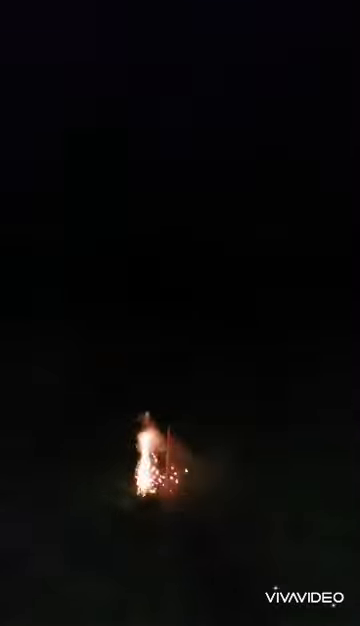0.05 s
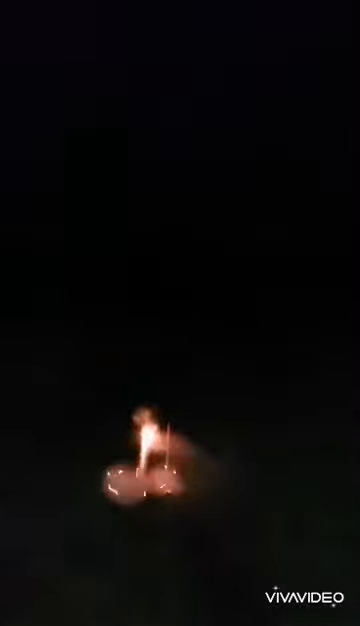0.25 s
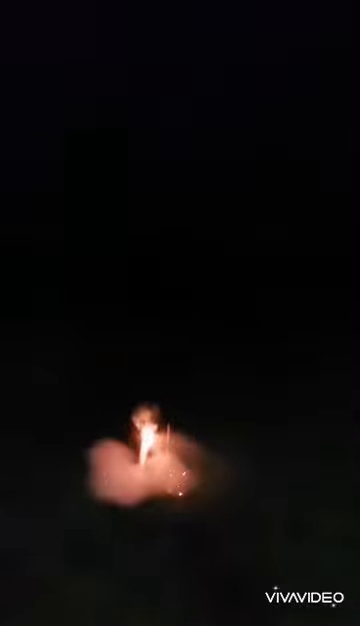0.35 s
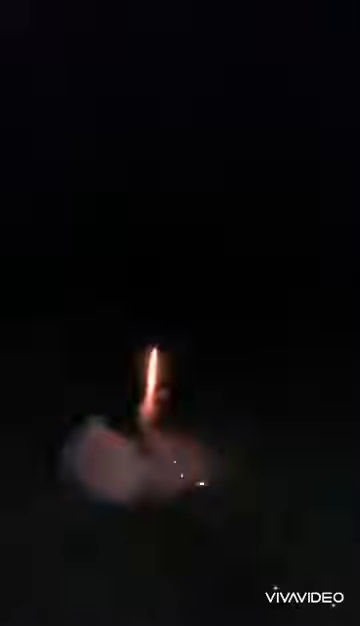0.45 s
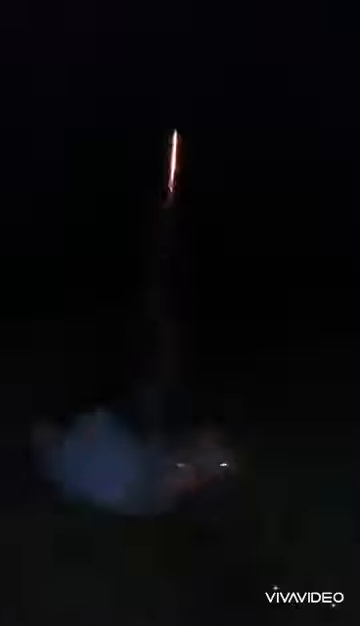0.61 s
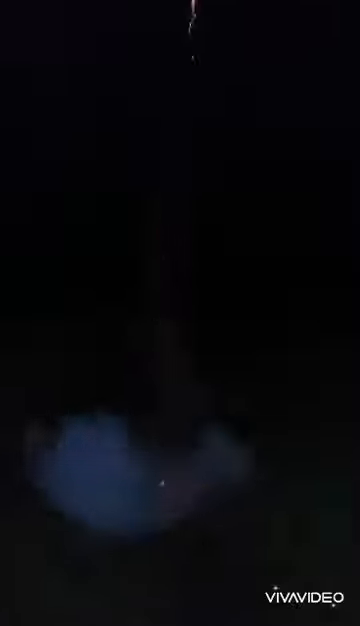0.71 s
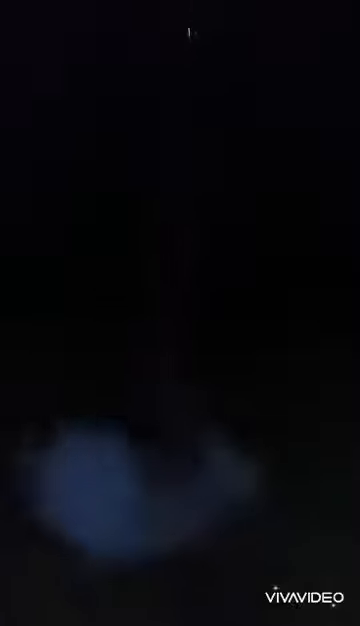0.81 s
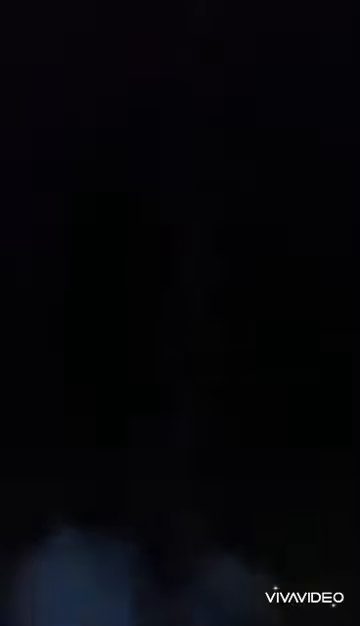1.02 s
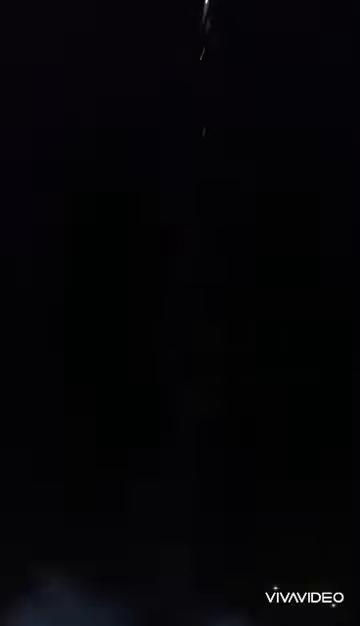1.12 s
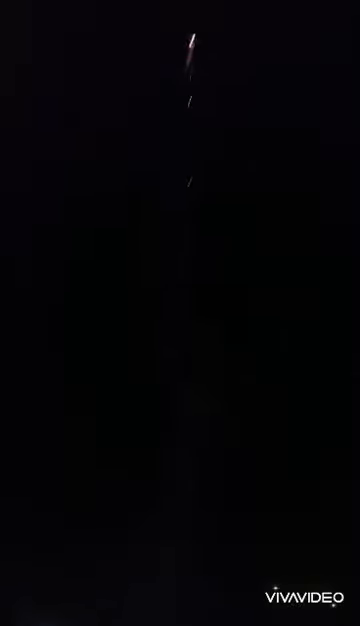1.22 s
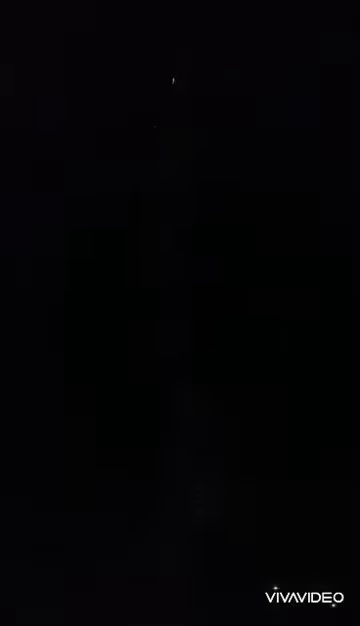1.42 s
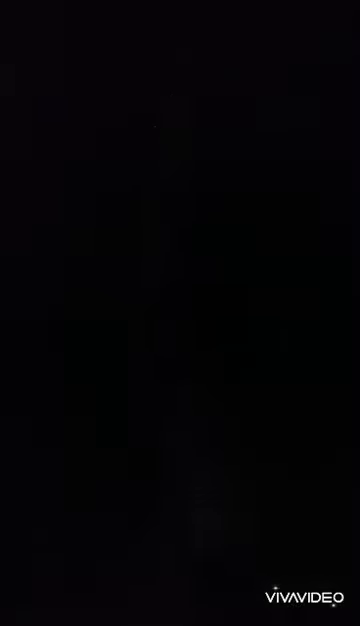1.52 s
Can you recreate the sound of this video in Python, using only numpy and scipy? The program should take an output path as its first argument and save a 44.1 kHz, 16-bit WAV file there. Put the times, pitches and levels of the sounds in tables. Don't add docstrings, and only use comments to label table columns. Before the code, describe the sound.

A firework rocket takes off outdoors at night, its rushing hiss swelling quickly to a loud whoosh with popping air thuds on a close phone microphone, then dropping to a faint hiss as it climbs.

```python
import sys
import numpy as np
from scipy import signal
from scipy.fft import rfft, irfft, next_fast_len
from scipy.io import wavfile
from scipy.ndimage import uniform_filter1d, map_coordinates

SR = 44100
rng = np.random.default_rng(int(sys.argv[2]) if len(sys.argv) > 2 else 0)


def makeup_ratio(level_db):
    decades = np.asarray(level_db, float) / 20
    return 10 ** decades


def master_out(mix):
    frames = np.transpose(np.atleast_2d(mix))
    ceiling = np.clip(frames, -1, 1)
    pcm = np.round(ceiling * 32767).astype(np.int16)
    wavfile.write(sys.argv[1], SR, pcm)


N = 68355

# f/Hz, density/dB per Hz
BREEZE_SPECTRUM = [(15, 14.5), (40, -13.5), (100, -11), (300, -7), (600, -32)]
# t/s, level/dB, brightness/dB per octave, right port over left/dB
BURN = [(0, -55.5, 1.5, -1.5), (.04, -55.5, 0, -4.5), (0.127, -36, 2, -1.6), (0.171, -33, 1, -4),
        (0.257, -24.5, 1.6, 0.1), (.36, -23, 1.9, -0.1), (0.502, -18.5, 0.94, 0.2), (.62, -19, 0.27, 0),
        (0.652, -20, 2.7, 0.5), (0.668, -15.5, -0.26, -0.7), (0.701, -22, 2, 3), (0.734, -22.5, 1.4, -4.1),
        (0.802, -34, 0.6, -2), (.87, -36, 1, -2.2), (1.07, -37, -0.37, 2.6), (1.26, -37.5, -1.57, -1.6),
        (1.4, -37.5, -1.4, -0.5), (1.55, -38.5, -2, -0.5)]
# t/s, elevation/1 (0 on the turf, 1 overhead)
CLIMB = [
    (0, 0.016),
    (.57, 0.0069),
    (.7, 0.434),
    (.85, 0.96),
    (1.0, 1.1),
    (1.3, .93),
    (1.55, 0.92),
]
# f/Hz, density/dB per Hz
JET_SPECTRUM = [(60, -12.5), (300, -2), (900, -1.5), (2500, -1), (7000, -4), (8500, -5.5), (10500, -8),
                (15500, -13.5)]
# f/Hz, gain/dB
OVERHEAD_COLOUR = [(200, -15), (700, -0.5), (2500, 2.5), (6000, -0.5), (10000, 6), (15500, 9)]
# f/Hz, gain/dB
RIGHT_PORT_GAIN = [(100, 3.5), (400, 1.5), (1200, 5.5), (3500, 3), (7000, 3), (8500, 5.5), (11000, 9.5),
                   (15500, 10.5)]
# f/Hz, gain/dB
RIGHT_OVERHEAD_GAIN = [(300, 1.2), (1500, 0.5), (3500, 2.5), (8500, -4), (10500, -6), (13000, -2),
                       (15500, -9)]
# f/Hz, phase/rad
RIGHT_PORT_PHASE = [(50, 0), (900, 1.05), (2600, 1.2), (3800, 3.0), (6200, 3.3), (7800, 2.0), (11000, .5),
                    (15000, -3.1)]
# f/Hz, shared power/1
PORT_LIKENESS = [(60, .3), (250, .7), (1000, .93), (2000, .75), (3000, .3), (5000, .6), (8000, .35),
                 (15000, .3)]
# f/Hz, width/Hz, gain/dB
CASE_SHADOWS = [(7800, 450, -6), (11900, 300, -4), (13800, 500, -8)]
# t/s, f/Hz
TILT_NOTCH = [(0, 3600), (.6, 3500), (.7, 2950), (.79, 3750), (.9, 3200), (1.15, 2800), (1.28, 3200),
              (1.4, 3600), (1.55, 3700)]
# f/Hz, density/dB per Hz
WAKE_SPECTRUM = [(40, -1), (100, -16), (250, 5), (500, -9), (900, -34)]
# t/s, peak pressure/full scale, rise/ms, fall/ms
PUFFS_LEFT = [(.5895, .22, .7, 4), (.593, .34, .7, 8), (.6075, -.2, 1.5, 6), (.615, -.27, 1, 7),
              (.6565, -.13, 3, 5), (.665, .26, 1.5, 3), (.668, .22, .3, .8), (.672, -.34, 1.5, 2.5),
              (.6781, .55, .3, 2.2), (.6803, -.5, .5, 2.5), (.686, .05, 3, 25), (.718, .08, 1.5, 8),
              (.7327, .4, .5, 5)]
PUFFS_RIGHT = [(.5622, .17, .4, 5), (.5815, -.06, .6, 2.5), (.6685, .17, .5, 5), (.675, -.24, .4, 6),
               (.6778, -.14, .6, 7), (.7155, .05, .5, 3)]
# f/Hz, density/dB per Hz
RASP_SPECTRUM = [(100, 14), (400, -2), (1000, 7), (2500, -23), (6000, -32)]

GUST_S = 0.673


def unit(x):
    return x / np.sqrt(np.mean(np.abs(x) ** 2) + 1e-20)


def along(points, hz):
    f, value = np.transpose(points)
    return np.interp(np.log(hz + 1), np.log(f + 1), value)


def wobble(rate):
    knots = rng.standard_normal(int(N * rate / SR) + 4)
    return map_coordinates(knots, [np.arange(N) * rate / SR])


def filtered(x, response):
    m = next_fast_len(N + SR)
    return irfft(rfft(x, m) * response(np.fft.rfftfreq(m, 1 / SR)), m)[..., :N]


def wind_noise(spectrum):
    return filtered(rng.standard_normal((2, N)), lambda hz: makeup_ratio(along(spectrum, hz)))


def night():
    lumps = makeup_ratio(4 * np.array([wobble(9.17), wobble(9.7)]))
    breeze = unit(lumps * wind_noise(BREEZE_SPECTRUM))
    port_balance = makeup_ratio([[2], [-2]])
    return makeup_ratio(-58) * breeze * port_balance + makeup_ratio(-68) * rng.standard_normal((2, N))


def turbulence():
    sparks_per_s, spark_db, flutter_db, patchy_db = 2000, 1.3, 0.5, 2.5
    sparks = (rng.random(N) < sparks_per_s / SR) * rng.exponential(1, N)
    rough = makeup_ratio(spark_db * uniform_filter1d(sparks, size=12) * 7.96 + flutter_db * wobble(39.1))
    hz, t, z = signal.stft(rough * rng.standard_normal((3, N)), SR, nperseg=512, noverlap=384)
    patches = uniform_filter1d(rng.standard_normal(z.shape[1:]), size=2, axis=0)
    patches = uniform_filter1d(patches, size=22, axis=1)
    return hz[:, None], t, z * makeup_ratio(patchy_db * unit(patches))


def turf_comb(hz, up):
    lag_ms = 0.98 + 3.0 * up
    echo = 0.5 * np.clip(1 - up, 0, 1) / (1 + (hz / 4500) ** 2)
    return 1 + echo * np.exp(-2j * np.pi * hz * lag_ms / 1000)


def jet_colour(hz, t, up):
    s, level_db, bright, _ = np.transpose(BURN)
    hump_db = np.interp(np.interp(t, s, level_db), [-40, -22], [10.5, 6])
    hiss_db = hump_db * np.exp(-(np.log2((hz + 1) / 5620) / 0.62) ** 2)
    tilt_db = np.interp(t, s, bright) * np.log2((hz + 300) / 4000)
    colour_db = along(JET_SPECTRUM, hz) + hiss_db + up * along(OVERHEAD_COLOUR, hz) + tilt_db
    colour = makeup_ratio(colour_db) * turf_comb(hz, up)
    return colour / np.sqrt(np.mean(np.abs(colour[8:175]) ** 2, axis=0))


def right_port(hz, t, up, slide):
    duct_hz, lag_ms = 2170, 0.325
    kept = 1 - 0.7 * np.clip(4 * up * (1 - up), 0, 1)
    echo = kept * np.clip(0.38 + (0.3 - 0.38) * up, 0, 0.9)
    duct = np.sqrt(1 - echo ** 2) / np.abs(1 + echo * np.exp(-1j * np.pi * hz / duct_hz))
    shadow_db = sum(db * np.exp(-((hz - centre) / width) ** 2) for centre, width, db in CASE_SHADOWS)
    gain_db = kept * shadow_db - 7 * slide
    gain_db = gain_db + along(RIGHT_PORT_GAIN, hz) + up * along(RIGHT_OVERHEAD_GAIN, hz)
    s, _, _, right_db = np.transpose(BURN)
    gain_db = gain_db + np.interp(t, s, right_db)
    phase = along(RIGHT_PORT_PHASE, hz) - 2 * np.pi * hz * lag_ms / 1000 * up
    return duct * makeup_ratio(gain_db) * np.exp(1j * phase)


def rocket():
    hz, t, (shared, own_left, own_right) = turbulence()
    up = np.interp(t, *np.transpose(CLIMB))
    alike = along(PORT_LIKENESS, hz) * (1 - 0.25 * np.clip(up, 0, 1))
    left, right = [np.sqrt(alike) * shared + np.sqrt(1 - alike) * own for own in (own_left, own_right)]
    slide = np.exp(-((hz - np.interp(t, *np.transpose(TILT_NOTCH))) / 330) ** 2)
    ports = np.array([makeup_ratio(-2.5 * slide) * left, right_port(hz, t, up, slide) * right])
    jet = signal.istft(jet_colour(hz, t, up) * ports, SR, nperseg=512, noverlap=384)[1][:, :N]
    s, level_db, _, _ = np.transpose(BURN)
    return unit(jet) * makeup_ratio(np.interp(np.arange(N) / SR, s, level_db + 2.5))


def wake():
    start_s, rise_s, t60_s = 0.528, 0.033, 0.41
    t = np.arange(N) / SR
    fade = np.clip((t - start_s) / rise_s, 0, 1) * makeup_ratio(-60 * np.maximum(t - GUST_S, 0) / t60_s)
    return makeup_ratio(-36.5) * fade * unit(wind_noise(WAKE_SPECTRUM))


def puffs(rows):
    out = np.zeros(N)
    t_ms = np.arange(SR // 10) * 1000 / SR
    ragged = 1 + 0.12 * wobble(700)
    for s, top, rise_ms, fall_ms in rows:
        push = (1 - np.exp(-(t_ms / rise_ms) ** 2)) * np.exp(-t_ms / fall_ms)
        out[round(s * SR):][:len(t_ms)] += top * push / push.max()
    return out * ragged


def rasp():
    width_s = 0.008
    swell = np.exp(-((np.arange(N) / SR - GUST_S) / width_s) ** 2)
    return makeup_ratio([[-23], [-27]]) * swell * unit(wind_noise(RASP_SPECTRUM))


def scene():
    blast = wake() + np.array([puffs(PUFFS_LEFT), puffs(PUFFS_RIGHT)]) + rasp()
    return night() + rocket() + blast


def low_pass(x):
    return signal.sosfilt(signal.butter(12, 16780, fs=SR, output="sos"), x)


def record(dry):
    clip_top, low_hz, top_hz = 0.85, 5, 15500
    soft = dry / (1 + np.abs(dry / clip_top) ** 4) ** 0.25
    mix = filtered(soft, lambda hz: (hz < top_hz) * 1j * hz / (low_hz + 1j * hz))
    return low_pass(mix)


dry = scene()
out = record(dry)
master_out(out)
```